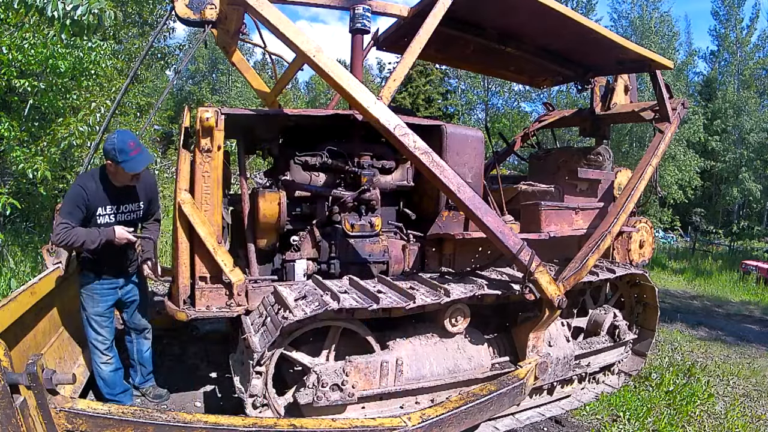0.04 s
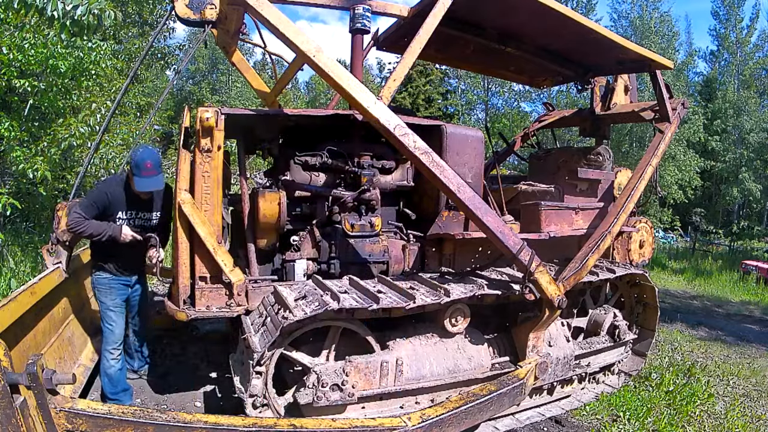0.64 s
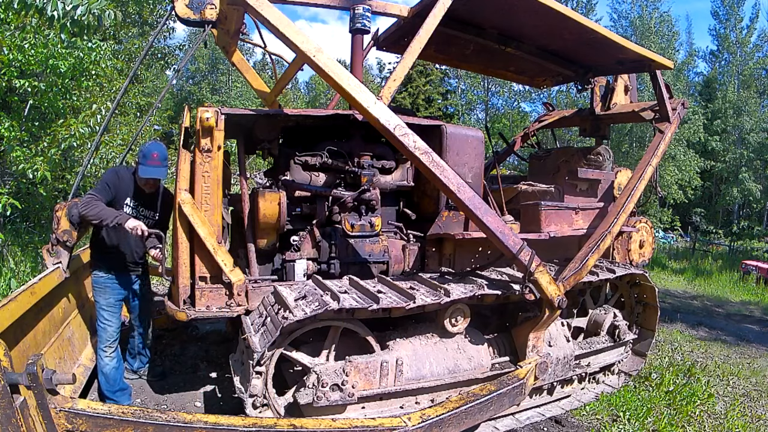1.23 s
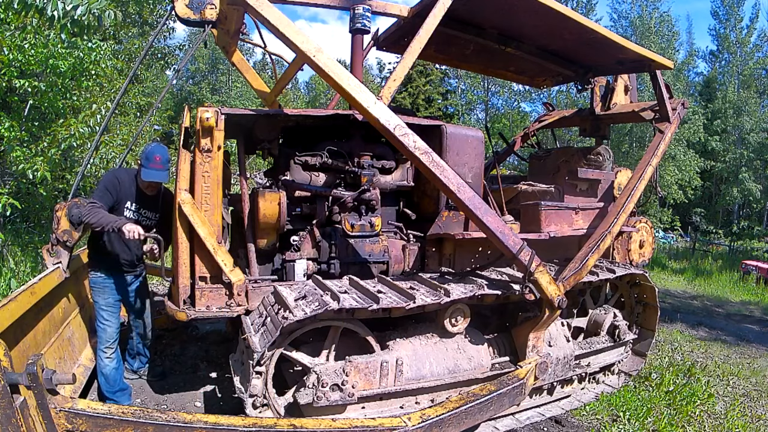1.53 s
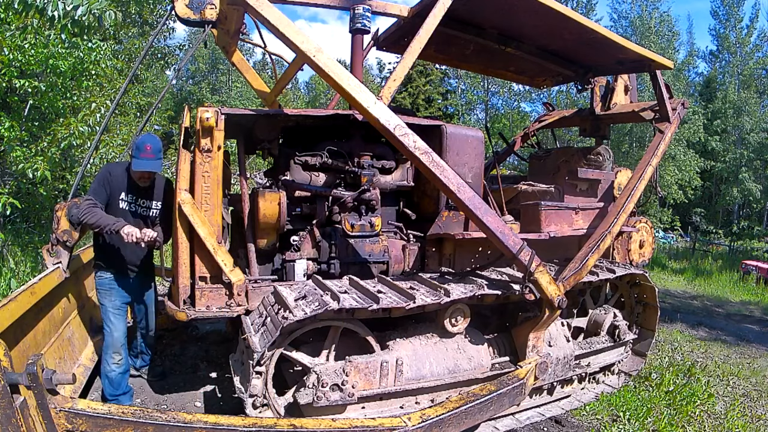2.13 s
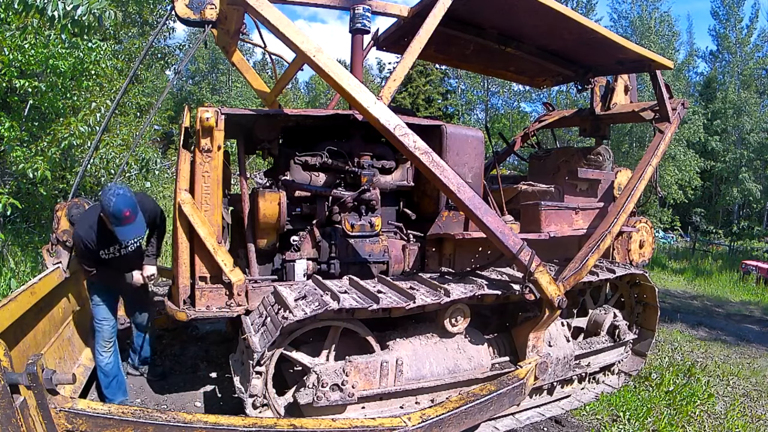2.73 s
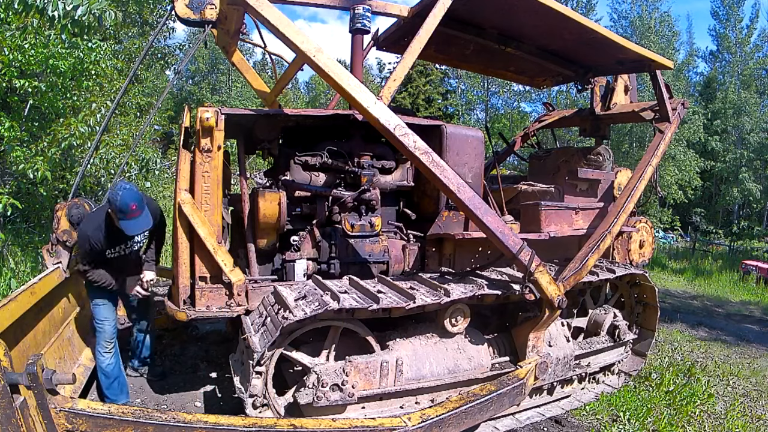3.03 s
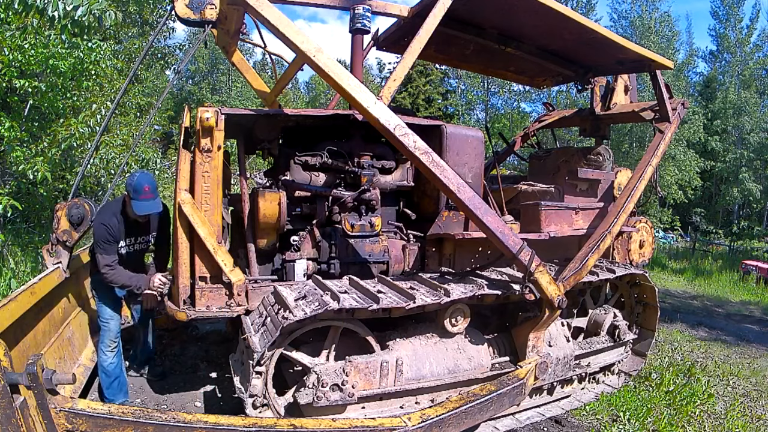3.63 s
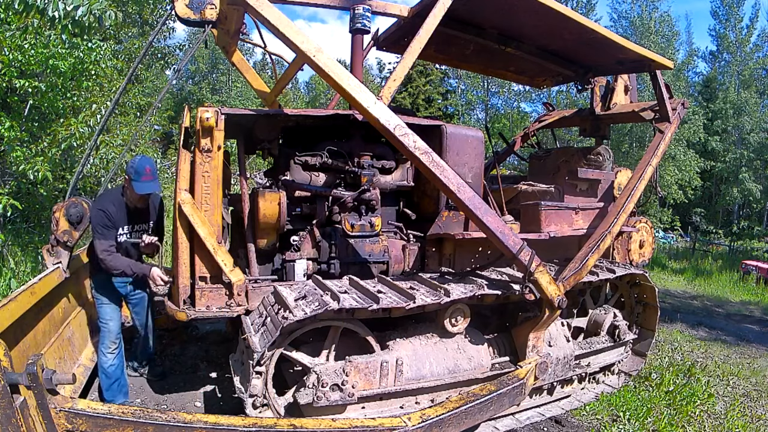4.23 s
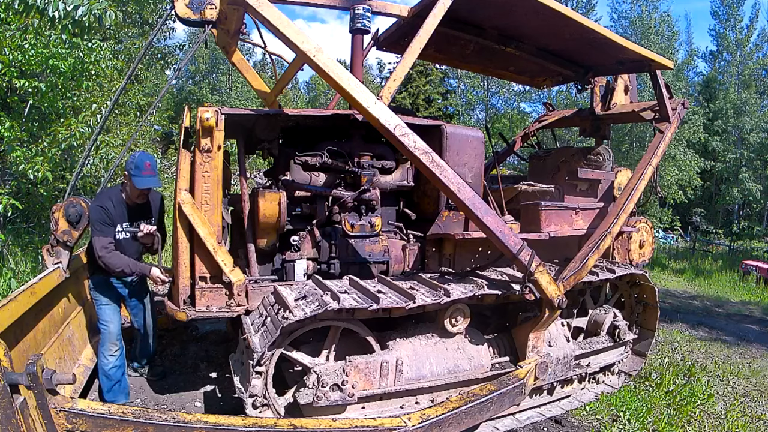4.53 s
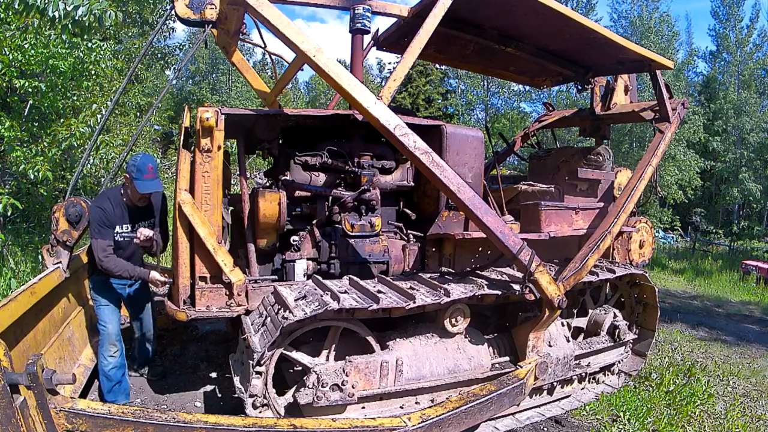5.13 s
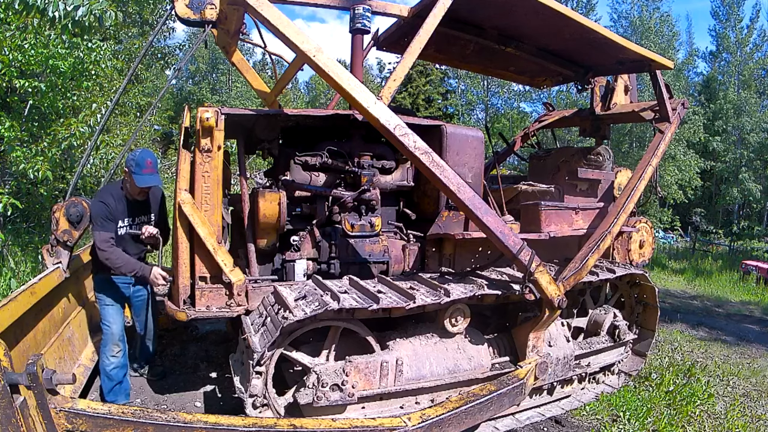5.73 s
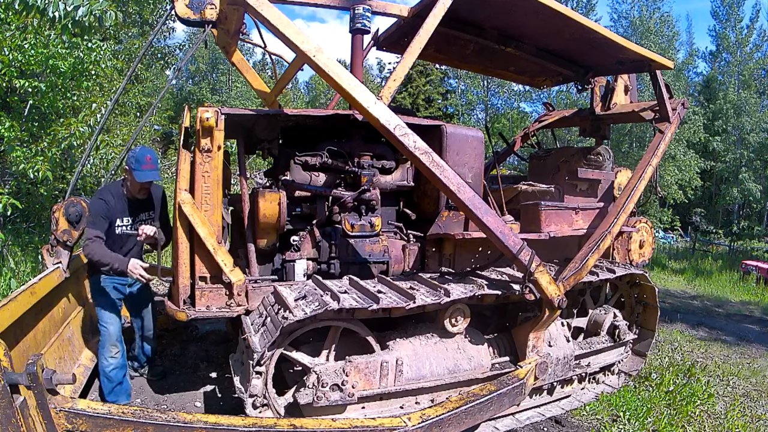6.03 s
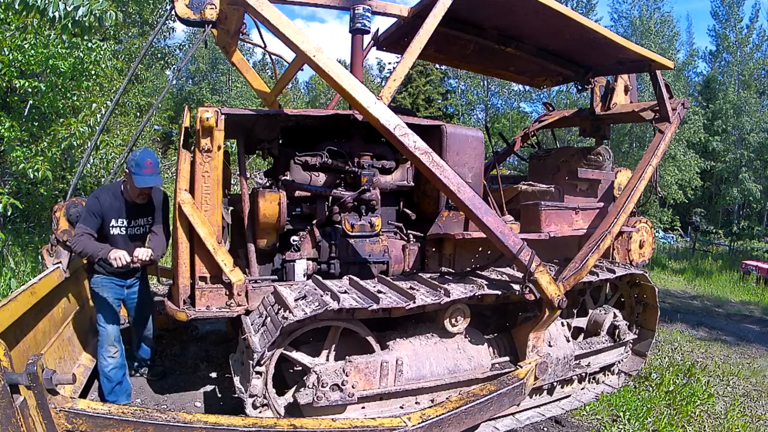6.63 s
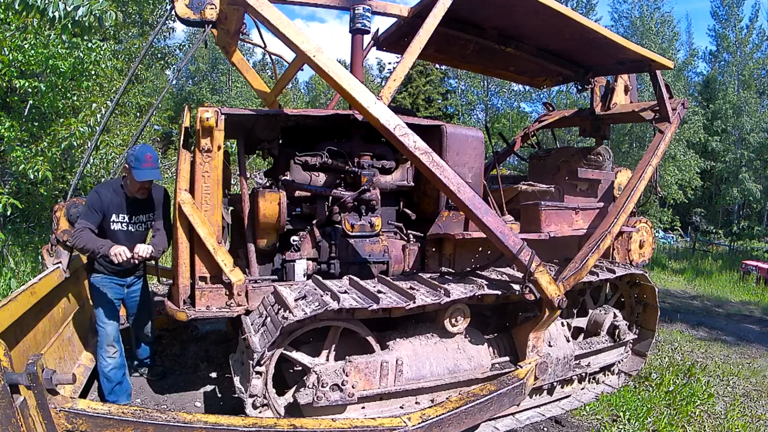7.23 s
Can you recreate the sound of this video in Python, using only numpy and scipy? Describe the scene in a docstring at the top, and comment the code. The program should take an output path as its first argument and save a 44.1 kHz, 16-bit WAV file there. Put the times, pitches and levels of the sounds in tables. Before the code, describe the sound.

A steel hand crank is fitted to an old crawler tractor in quiet outdoor air with a faint low hum. Light clinks and soft scuffs open, with a sharper clink at about 0.8 seconds. Around 2.3 seconds a thin hiss swells, and from 2.5 to 2.8 seconds comes the loudest event: a quick cluster of heavy steel clashes and rattles, with a sheet metal thud, more hiss and a brief groan. The frame rings on shortly, and the engine never fires. A dull knock follows at 3 seconds, then rattling clinks around 3.4 to 3.6 seconds and small bright ticks near 4.2 seconds. Soft thuds and scuffs come sparsely after that, with one more clear clink at 5.7 seconds. From about 5.4 to 6.5 seconds a very faint, distant bird gives three thin whistles and a quick run. A faint hiss comes near 7.2 seconds.

```python
"""Hand crank on an old crawler tractor in a forest clearing: fitted, swung once, no firing. The crank clinks
while held free, then clashes and rattles in its dog; bar, bracket and frame ring on. Also dull soft scuffs,
thuds of sheet steel and swells of thin hiss, with a groan at the clash. Behind it: quiet outdoor air, a faint
hum and a small, distant bird."""
import sys
import numpy as np
from scipy import signal
from scipy.io import wavfile

SR = 44100
rng = np.random.default_rng(int(sys.argv[2]) if len(sys.argv) > 2 else 0)


def store_pcm(level_fs):
    """Save levels as 16-bit WAV."""
    pcm = np.round(np.clip(level_fs, -1, 1) * 32767).astype(np.int16)
    wavfile.write(sys.argv[1], SR, np.atleast_2d(pcm).T)


N = 325017

# outdoor air: (frequency [Hz], relative density [dB])
AIR_SPECTRUM = [(20, -15), (40, -7), (62, -7), (85, -9), (125, -13.5), (160, -14.5), (250, -19),
                (420, -20.5), (950, -25.5), (1600, -33.5), (2600, -37), (6000, -40), (15000, -42)]
# bird notes: (length [s], start pitch [Hz], turning pitch [Hz], level [dB])
WHISTLE, UP, LOW = (.08, 4607, 4494, -70), (.048, 4545.5, 5080, -67.5), (.055, 4230.5, 4169, -69)
# three slow whistles, then a quick run: (onset [beats], note)
SONG = [(0, WHISTLE), (3, WHISTLE), (6, WHISTLE), *enumerate([UP, UP, LOW] * 2 + [UP], 9)]
# swells of high, thin hiss: (start [s], length [s], gain [dB])
HISS_SWELLS = [(2.308, 0.148, -51.5), (2.623, 0.2033, -47.5), (2.885, 0.27, -65), (5.097, 0.375, -69.5),
               (7.15, 0.13, -69.5)]
# bands of the thin hiss: (frequency [Hz], width [Hz], gain [dB])
HISS_BANDS = [(4330, 650, -12.5), (5740, 1200, -7.5), (6690, 800, -7.5), (10000, 700, -15.5),
              (12400, 1300, -13.5)]
# broader hiss in the strong swells: (frequency [Hz], relative density [dB])
HISS_SPECTRUM = [(2500, -13.5), (4300, 6.5), (6300, -15), (8200, -16), (10200, -7), (12700, -5.5),
                 (14000, -16), (16000, -17)]
# soft knocks on sheet steel: (time [s], drive [dB], pitch [Hz])
PANEL_KNOCKS = [(1.441, -50, 190), (2.236, -37.5, 156.6), (2.467, -24.5, 265.3), (2.472, -18, 374.6),
                (2.531, -30, 74.5), (2.996, -37.5, 157), (4.664, -49, 162), (4.72, -51.5, 165),
                (5.793, -44.5, 174.6), (6.464, -48.5, 173.4)]
# clearest frame modes: (frequency [Hz], relative level [dB])
FRAME_MODES = [(215.3, -60), (262, -54.5), (296.1, -53.5), (371.4, -53.5), (425.3, -51.5), (559.9, -54.5),
               (791.3, -53.5), (834.4, -49), (918, -56.5), (1036, -56.5), (1167, -53), (1308, -55.5),
               (1410, -60), (1513, -54), (1642, -58), (1825, -59), (2358, -62.5), (2724, -64),
               (3133, -63.5), (3813, -58.5), (4097, -59.5), (5594, -57.5), (5812, -56), (5945, -54.5)]
# dense steel modes: (frequency [Hz], relative density [dB])
STEEL_SPECTRUM = [(59, -38.5), (100, -26.5), (322, 5.5), (583, -1.5), (836, -3.5), (1330, -2.5),
                  (2000, -12), (3250, -9.5), (4110, -6.5), (4670, -14), (5900, -8.5), (7770, -21.5),
                  (12100, -17.5), (13800, -34), (16000, -25.5)]
# their decay: (frequency [Hz], clash T60 [s], after-ring T60 [s], after-ring gain [dB])
STEEL_DECAY = [(150, 0.06, 1.7, 0), (367, 0.13, 1.1, -17.5), (858, 0.12, 0.68, -22),
               (1544, 0.083, 0.42, -12), (2580, 0.1, 0.37, -15), (4830, 0.12, 0.63, -23.5),
               (12000, 0.072, .2, -25.5)]
# bracket resonances: (frequency [Hz], width [Hz], gain [dB])
BRACKET_BANDS = [(778, 336, 6.5), (1375, 240, -12), (4144, 430, -1.5), (5640, 590, 1.5)]
# crank bar modes: (frequency [Hz], relative level [dB], T60 [s])
BAR_MODES = [(844, -2.5, 0.067), (954, -13, .22), (4060, -5, 0.03), (4280, -4, 0.021), (5330, -15, 0.053),
             (5700, -13.5, .04), (8140, -26, 0.048), (8070, -28, 0.087), (10415, -21.5, 0.047),
             (10400, -26, 0.053), (11820, -22, 0.098)]
# bright steel clinks and clashes, and dull soft scuffs:
# (time [s], drive [dB], relative clink [dB], relative sizzle [dB])
KNOCKS = [(0.047, -44.5, -16, -29), (0.081, -43.5, -13.5, -27), (0.158, -39, -8.5, -33),
          (0.45, -45.5, -27.5, -28), (0.685, -37, -24, -34), (0.756, -22.5, -8, -15.5),
          (1.014, -46.5, -42, -26), (1.404, -45.5, -45, -30), (2.224, -38, -42, -42), (2.465, -10, 3.5, -7),
          (2.481, -10.5, -13, -31), (2.503, -15.5, 2, -6), (2.523, -7, -10.5, -30), (2.622, -7, -14, -27),
          (2.722, -34.5, -3, -5), (2.747, -22.5, -16, -24), (2.993, -32.5, -23.5, -33),
          (3.102, -51.5, -2.5, -16), (3.429, -28.5, -5.5, -17.5), (3.476, -23.5, -7.5, -26),
          (3.582, -33, -20.5, -35), (3.623, -25, -14.5, -22.5), (3.88, -45, -24, -32),
          (4.144, -44.5, -1.5, -22.5), (4.183, -42.5, -19, -30), (4.248, -55.5, 4, -2),
          (4.308, -42, -38.5, -35), (5.264, -39.5, -22, -27), (5.515, -45, -20.5, -26),
          (5.604, -35.5, -19, -36), (5.703, -23, -6, -32), (5.749, -46, -9, -33), (5.792, -39, -36, -36)]

CUTOFF_HZ = 15900
IN_DOG_S = (2.4, 4.0)


def from_db(db):
    return 10 ** (np.asarray(db) / 20)


def unit_rms(x):
    return x / np.sqrt(np.mean(x ** 2) + 1e-20)


def blend(a, b, share):
    return a * (1 - share) + b * share


def at_hz(rows, hz):
    """Table columns interpolated over log frequency."""
    table_hz, *columns = np.transpose(rows)
    return [np.interp(np.log(hz), np.log(table_hz), c) for c in columns]


def clicks(times_s, sizes):
    """Single-sample impulses."""
    out = np.full(N, 1e-18)
    np.add.at(out, (np.asarray(times_s) * SR).astype(int), sizes)
    return out


def ring(force, hz, t60_s):
    """One mode: a unit impulse gives a decaying unit sine."""
    r, w = np.exp(-np.log(1000) / (t60_s * SR)), 2 * np.pi * hz / SR
    return signal.lfilter([0, np.sin(w)], [1, -2 * r * np.cos(w), r * r], force)


def leak(energy, t60_s):
    """Stored energy, decaying exponentially."""
    return signal.lfilter([1], [1, -np.exp(-2 * np.log(1000) / (t60_s * SR))], energy)


def bandpass(x, low_hz, high_hz):
    return signal.sosfilt(signal.butter(2, [low_hz, high_hz], "band", fs=SR, output="sos"), x)


def noise_bands(low_hz, count):
    """Yields (centre [Hz], noise band) up to the cutoff; equal power per Hz."""
    edges_hz, white = np.geomspace(low_hz, CUTOFF_HZ, count + 1), rng.standard_normal((2, N))
    for k, (low, high) in enumerate(zip(edges_hz, edges_hz[1:])):
        yield np.sqrt(low * high), bandpass(white[k % 2], low, high)


def coloured_noise(spectrum, low_hz, count):
    """Steady shaped noise; RMS 1."""
    bands = noise_bands(low_hz, count)
    return unit_rms(sum(band * from_db(at_hz(spectrum, hz)[0]) for hz, band in bands))


def resonant_noise(hz, width_hz):
    """Noise in one steep resonance; RMS 1."""
    peak = signal.iirpeak(hz, hz / width_hz, fs=SR)
    return unit_rms(signal.lfilter(*peak, signal.lfilter(*peak, rng.standard_normal(N))))


def air(rms_db=-57):
    """Steady outdoor noise, mostly bass."""
    return from_db(rms_db) * coloured_noise(AIR_SPECTRUM, low_hz=18, count=36)


def hum(hz=61, rms_db=-66, waver=0.059, waver_rate_hz=14):
    """Far hum, wavering in pitch."""
    knots_s = np.arange(0, N / SR + 1, 1 / waver_rate_hz)
    drift = np.interp(np.arange(N) / SR, knots_s, rng.standard_normal(len(knots_s)))
    pitch_hz = hz * (1 + waver * drift)
    return from_db(rms_db) * unit_rms(np.sin(2 * np.pi * np.cumsum(pitch_hz) / SR))


def bird(onset_s=5.385, beat_s=.069, scatter_hz=70, scatter_db=1.5, echo_db=-10):
    """Thin whistles that glide and hook back, blurred by echoes off the trees."""
    notes = np.array([(onset_s + beat * beat_s, *note) for beat, note in SONG])
    notes += rng.standard_normal(notes.shape) * [0, 0, scatter_hz, scatter_hz, scatter_db]
    direct = np.zeros(N)
    for time_s, length_s, start_hz, turn_hz, db in notes:
        n, at = int(length_s * SR), int(time_s * SR)
        pitch_hz = blend(start_hz, turn_hz, np.sin(np.linspace(0, 2 * np.pi / 3, n)) ** 2)
        direct[at:at + n] += from_db(db) * np.hanning(n) * np.sin(2 * np.pi * np.cumsum(pitch_hz) / SR)
    echoes = sum(np.roll(direct, int(lag_s * SR)) for lag_s in rng.uniform(.002, .025, size=4))
    return direct + from_db(echo_db) * echoes


def hiss_swells(attack_s=.086, release_s=.012, broad_db=-2, groan_db=6):
    """Swells of high, thin hiss; strongest around the clash, where a 1 kHz groan joins."""
    t, swell = np.arange(N) / SR, 0
    for start_s, length_s, db in HISS_SWELLS:
        rise = np.clip((t - start_s) / attack_s, 0, 1)
        fall = np.clip((start_s + length_s - t) / release_s, 0, 1)
        swell += from_db(db) * (rise * fall) ** 2
    thin = sum(from_db(db) * resonant_noise(hz, width_hz) for hz, width_hz, db in HISS_BANDS)
    broad = from_db(broad_db) * coloured_noise(HISS_SPECTRUM, low_hz=2500, count=14)
    groan = from_db(groan_db) * resonant_noise(hz=1020, width_hz=500)
    strength = (swell / swell.max()) ** .3
    return swell * (thin + strength * (broad + groan))


def thuds(t60_s=.2743, upper_db=-6, overtone_db=-5):
    """Sheet steel: two low modes, one brief overtone. Soft contact: no treble; open sheet: no sub-bass."""
    out = 0
    for time_s, db, hz in PANEL_KNOCKS:
        push = clicks([time_s], from_db(db))
        out += ring(push, hz, t60_s) - from_db(upper_db) * ring(push, 1.23 * hz, t60_s)
        out += from_db(overtone_db) * ring(push, 1.9 * hz, t60_s=.052)
    return bandpass(out, low_hz=70, high_hz=500)


def in_dog(time_s):
    """True while the crank is pushed home."""
    return (time_s > IN_DOG_S[0]) & (time_s < IN_DOG_S[1])


def heaviness(level_db):
    """0: a light tap. 1: a blow that shakes the frame."""
    return np.interp(level_db, [-24, -13], [0, 1])


def blows(seat_s=.008, seat_treble_db=-10.5, bounce_treble_db=-6.5):
    """Each knock strikes, seats and, with the crank in its dog, bounces once. Columns as KNOCKS."""
    strikes = np.transpose(KNOCKS)
    time_s, level_db, clink_db, sizzle_db = strikes
    seat_db = np.interp(level_db, [-40, -27], [-8, -1.5])   # firm knocks seat harder
    seats = [time_s + seat_s, level_db + seat_db, clink_db + seat_treble_db, sizzle_db + seat_treble_db]
    heavy = heaviness(level_db)
    flight_s, bounce_db = blend(.047, .037, heavy), blend(-6.5, -9.5, heavy)
    bounces = np.array([time_s + flight_s, level_db + bounce_db,
                        clink_db + bounce_treble_db, sizzle_db + bounce_treble_db])
    return np.hstack([strikes, seats, bounces[:, in_dog(time_s)]])


def contacts(hard_s=.006, soft_s=.01, lead_s=.0012, count=6):
    """Chatter within each blow: tight for a bright or heavy hit, drawn out for a dull scuff."""
    time_s, level_db, clink_db, _ = blows()
    tap_s = np.interp(clink_db, [-28, -10], [soft_s, hard_s])
    length_s = blend(tap_s, hard_s, heaviness(level_db))
    touch = np.arange(count)
    step = touch + rng.uniform(-.33, .5, (len(time_s), count)) * (touch > 0)
    touches_s = time_s[:, None] - lead_s + length_s[:, None] * step / count
    force = (touch + .5) * np.exp(-touch / 1.46)   # graze, main touch, weaker ones
    return touches_s, force / np.linalg.norm(force)


def drive_db(hz, clink_ref_db=-7, sizzle_ref_db=-20):
    """Each blow's drive at one frequency: soft ones boom, heavy ones clang, edges clink and sizzle."""
    time_s, level_db, clink_db, sizzle_db = blows()
    heavy = heaviness(level_db)
    softness = np.interp(clink_db, [-30, -18], [1, 0]) * (1 - heavy)
    boom_db = blend(np.where(in_dog(time_s), -5.5, -7.5), 5.5, softness)
    clang_db = 2.7 * heavy
    treble_db, top_db = clink_db - clink_ref_db, sizzle_db - sizzle_ref_db
    colour = [(400, *boom_db), (720, *np.zeros_like(level_db)), (1500, *clang_db),
              (2900, *(clang_db + .25 * treble_db)), (3900, *treble_db), (6300, *treble_db),
              (9000, *top_db)]
    return level_db + at_hz(colour, hz)


def struck(touches_s, force, modes, gain_db, scatter_db=3):
    """Each blow lands elsewhere, so meets each mode with its own strength and sign."""
    out, chance = 0, rng.uniform(-.88, 1, (len(touches_s), len(modes), 2))
    for k, (hz, db, t60_s) in enumerate(modes):
        height = from_db(drive_db(hz) + db + gain_db + scatter_db * chance[:, k, 0])
        sign = np.sign(chance[:, k, 1])
        touch_sum = np.abs((force * np.exp(2j * np.pi * hz * touches_s)).sum(axis=1))
        sizes = sign * height / np.maximum(touch_sum, .8)   # offsets interference between touches
        out += ring(clicks(touches_s, sizes[:, None] * force), hz, t60_s)
    return out


def frame(touches_s, force, t60_at_1khz_s=.39, tap_db=22.5, heavy_db=25.5):
    """The frame rings on; high modes die first."""
    modes = [(hz, db, t60_at_1khz_s * (hz / 1000) ** -.44) for hz, db in FRAME_MODES]
    return struck(touches_s, force, modes, blend(tap_db, heavy_db, heaviness(blows()[1])))


def clash(touches_s, force, crack_t60_s=.015):
    """Dense steel modes as noise bands: crack, short clash, weak after-ring."""
    heavy, out = heaviness(blows()[1])[:, None], 0
    crack_db, clash_db, shake_db = blend(1, -1, heavy), blend(-2.5, -.5, heavy), blend(-.5, 2.5, heavy)
    for hz, band in noise_bands(low_hz=67.7, count=36):
        clash_t60_s, after_t60_s, after_db = at_hz(STEEL_DECAY, hz)
        push = force * from_db(drive_db(hz) + at_hz(STEEL_SPECTRUM, hz)[0])[:, None]
        stages = [(crack_db, crack_t60_s), (clash_db, clash_t60_s), (shake_db + after_db, after_t60_s)]
        power = sum(leak(clicks(touches_s, (push * from_db(db)) ** 2), t60_s) for db, t60_s in stages)
        out += band * np.sqrt(power)
    return out


def bracket(x):
    """The crank's bracket lifts a few broad bands."""
    return x + sum(from_db(db) * signal.lfilter(*signal.iirpeak(hz, hz / width_hz, fs=SR), x)
                   for hz, width_hz, db in BRACKET_BANDS)


def crank(touches_s, force, brush_db=-10, tap_db=-3, gripped_db=-15, free_db=1):
    """The bar: barely woken by a brush, rung by a tap (more out of the dog), muted under load."""
    time_s, level_db, _, _ = blows()
    ring_db = np.interp(level_db, [-34, -23.5, -21, -16.5], [brush_db, tap_db, tap_db, gripped_db])
    firmness = np.interp(level_db, [-38, -28], [0, 1])
    return struck(touches_s, force, BAR_MODES, ring_db + free_db * firmness * ~in_dog(time_s))


def scene():
    """Tractor in open air; mono."""
    touches_s, force = contacts()
    knocks = bracket(clash(touches_s, force)) + frame(touches_s, force) + crank(touches_s, force)
    foreground = knocks + thuds() + hiss_swells()
    outdoors = air() + bird() + hum()
    return (foreground + outdoors)[None]


def record(dry):
    """Soft clip, small DC offset, steep low-pass."""
    lowpass = signal.ellip(10, .1, 80, CUTOFF_HZ, fs=SR, output="sos")
    return signal.sosfilt(lowpass, np.tanh(dry) - .0033)


dry = scene()
out = record(dry)
store_pcm(out)
```